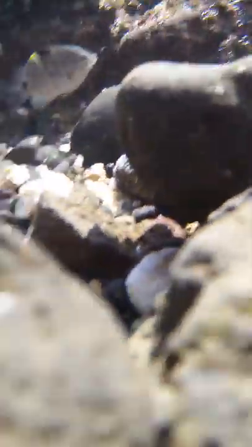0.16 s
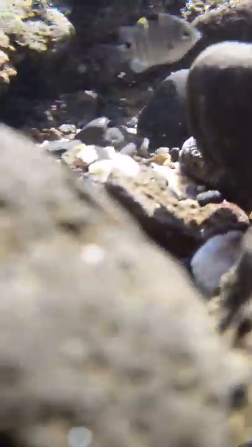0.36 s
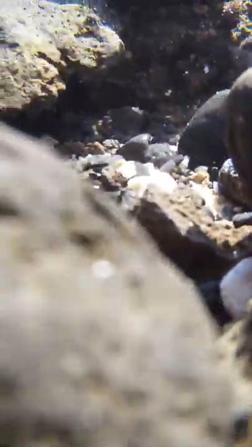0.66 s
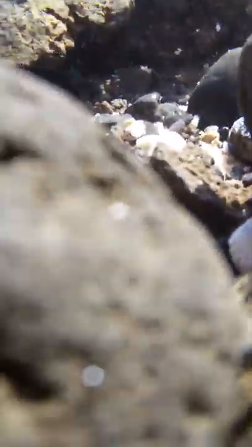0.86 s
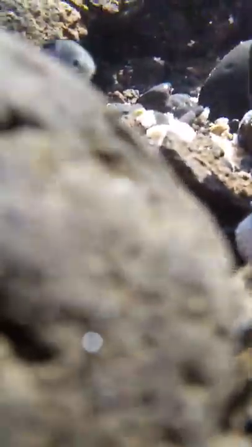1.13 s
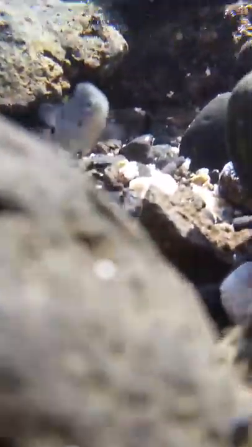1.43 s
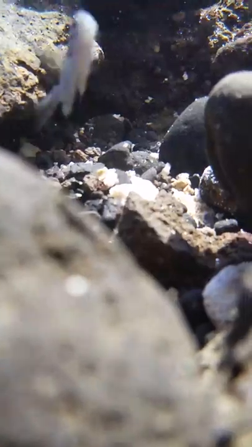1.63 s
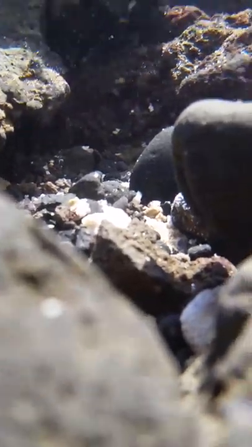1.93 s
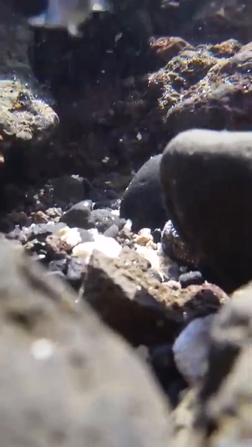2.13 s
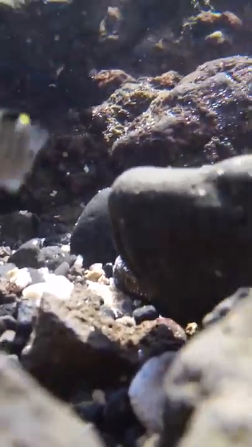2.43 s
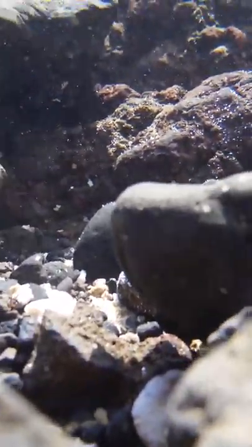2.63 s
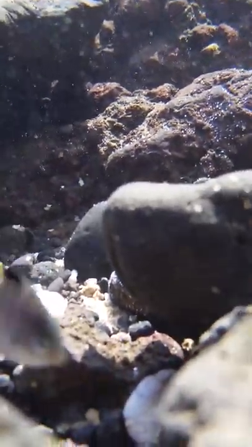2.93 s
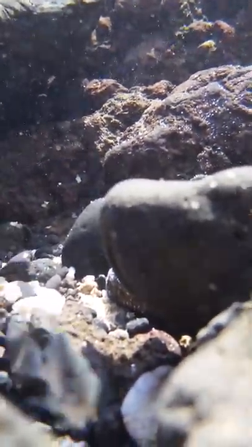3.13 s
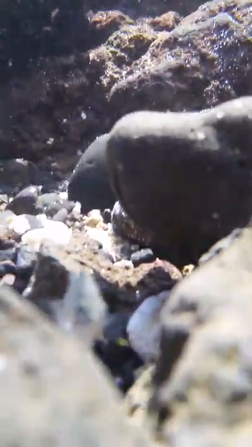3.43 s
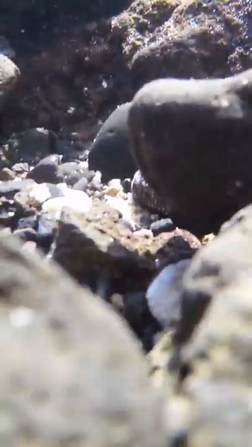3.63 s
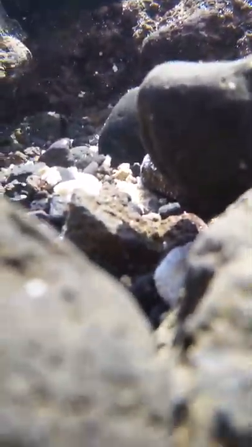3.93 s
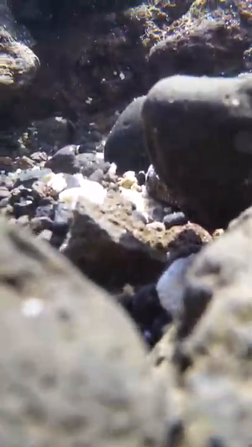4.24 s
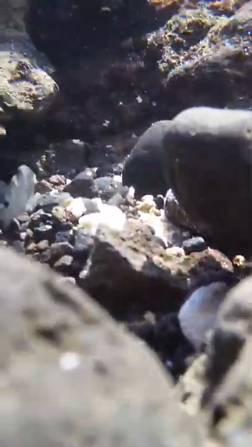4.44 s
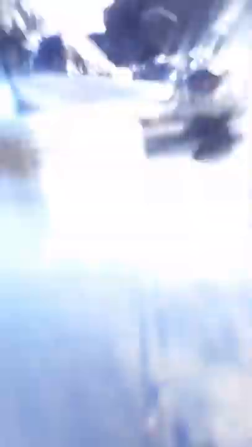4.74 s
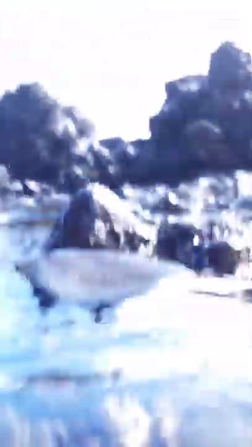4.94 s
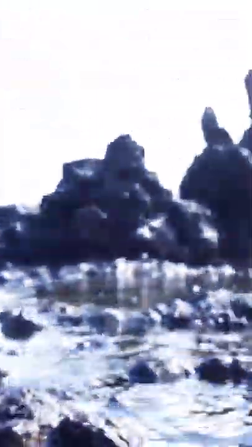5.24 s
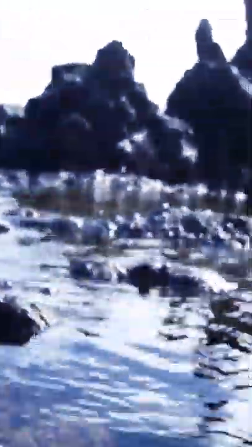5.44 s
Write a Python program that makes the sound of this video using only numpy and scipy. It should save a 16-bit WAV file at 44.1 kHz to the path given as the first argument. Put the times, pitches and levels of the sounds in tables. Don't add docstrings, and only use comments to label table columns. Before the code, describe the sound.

Hard stone knocks and gritty scrapes, mostly on the right, over a faint dull underwater wash with soft fizzing foam on the left.

```python
import sys
import numpy as np
from scipy import signal
from scipy.fft import rfft, irfft, next_fast_len
from scipy.io import wavfile
from scipy.ndimage import uniform_filter1d, minimum_filter1d

SR = 44100
rng = np.random.default_rng(int(sys.argv[2]) if len(sys.argv) > 2 else 0)


def to_wav(sig):
    pcm = np.clip(np.atleast_2d(sig), -1, 1) * 32767
    pcm = np.round(pcm).astype(np.int16)
    wavfile.write(sys.argv[1], SR, pcm.T)


def natural_amplitude(level_db):
    exponent = np.asarray(level_db, float) / 20
    return 10 ** exponent


N = 246519

# (time [s], level [dB])
SURGE = [(0, -46), (.25, -51), (.6, -49), (.77, -43.5), (.85, -46.5), (1.05, -52.5), (1.45, -51),
         (1.8, -52.5), (2.0, -49.5), (2.2, -52.5), (2.55, -48), (2.85, -41), (3.0, -48), (3.3, -46),
         (3.5, -49.5), (4.3, -45.5), (4.75, -46), (5.59, -48)]
# (frequency [Hz], level [dB per Hz])
LEFT_TONE = [(25, -19.5), (60, -1.5), (130, 1.5), (300, -8.5), (600, -22), (1000, -34.5), (1500, -48.5),
             (2100, -58), (2900, -60), (4500, -80), (9500, -75.5), (12200, -54), (15000, -57)]
RIGHT_TONE = [(25, -9.5), (50, 3.5), (150, 4), (400, -7), (750, -5.5), (950, -8), (1150, -32.5),
              (2100, -46), (2900, -29.5), (3700, -37), (4800, -52), (15000, -57)]
# (frequency [Hz], likeness [0-1])
LIKENESS = [(60, 0.93), (110, 0.93), (250, 0.7), (700, 0.9), (1200, 0.019)]
# (time [s], level [dB])
OPENING = [(0, 4.5), (.75, 0.5), (.9, 0), (1.5, 2), (3.5, 3), (4.0, -2.5), (4.4, 3.5), (4.75, 1),
           (4.9, 0.5), (5.5, -4), (5.59, 1.5)]
# (peak time [s], half width [s], level [dB])
FOAM = [
    (0, 0.34, -86.5),
    (0.689, 0.14, -80.5),
    (2.55, 0.11, -87.5),
    (2.879, 0.18, -76),
    (4.35, 0.19, -84.5),
    (4.62, 0.13, -76.5),
    (5.35, 1, -84),
]
# (time [s], half width [s], level [dB])
SPRAY = [
    (4.7655, .0015, -72),
    (4.7715, .001, -72),
    (4.805, .0015, -59),
    (4.808, .002, -55),
    (4.817, .002, -58),
]
# (time [s], level [dB], length [ms])
PUSHES = [
    (0.023, -26, 5.3),
    (0.394, -31, 20),
    (0.588, -45, 4.3),
    (0.692, -29, 11.4),
    (2.061, -23.5, 5),
    (4.738, -21.5, 7.7),
    (4.934, -29, 12),
    (4.994, -20.5, 10.7),
    (5.0658, -11, 3.26),
]
# (start [s], length [s], grit at start [dB], grit at end [dB])
STROKES = [(0, 0.02, -64, -71), (0.017, 0.22, -82, -85.5), (1.204, 0.018, -72.5, -75),
           (1.336, 0.055, -57, -72.5), (1.622, .008, -71, -57), (1.641, 0.013, -49.5, -45.5),
           (1.673, 0.041, -50.5, -80), (1.73, .07, -80, -81), (1.827, 0.087, -48.5, -51.5),
           (1.915, 0.054, -57.5, -68), (1.986, 0.056, -55, -57.5), (2.055, 0.1, -73, -88),
           (2.173, 0.059, -63.5, -72), (2.261, 0.054, -59, -68), (2.333, 0.1, -57, -58.5),
           (2.438, 0.073, -65, -54), (2.502, 0.11, -54.5, -48.5), (2.602, 0.023, -53, -49.5),
           (1.952, .025, -64.5, -58.5), (2.037, 0.017, -60, -63), (1.7, .025, -70, -69),
           (4.808, 0.012, -39.5, -45), (2.744, 0.021, -55.5, -47.5), (2.433, 0.052, -58.5, -67),
           (2.3, .03, -72, -72), (4.38, 0.25, -86, -86.5), (0.615, 0.11, -89, -88), (2.642, 0.1, -65, -65),
           (2.728, 0.038, -57.5, -54), (2.81, 0.082, -51.5, -61), (2.898, 0.052, -71, -73.5),
           (3.06, 0.043, -59.5, -68.5), (3.126, 0.049, -70, -78.5), (3.185, 0.043, -72, -71),
           (3.253, 0.034, -61.5, -49), (3.285, 0.062, -51.5, -50.5), (3.353, 0.054, -54.5, -40.5),
           (3.423, 0.28, -77, -86), (4.173, 0.078, -69.5, -56), (4.26, 0.11, -79, -82.5),
           (4.786, 0.023, -49, -28.5)]
# (frequency [Hz], width [Hz], level [dB])
GRIT_MODES = [(650, 517, 11.5), (2590, 1110, 4.5), (3487, 1300, 3)]
# (time [s], peak [dB], bright edge [dB])
TICKS = [(.017, -43, -42), (.0762, -34.5, -54), (.8136, -41.5, -10.5), (1.1913, -47, -24.5),
         (1.3808, -53.5, -43), (1.5884, -34, -25.5), (1.6092, -39, -49), (1.6468, -38, -66.5),
         (1.8267, -52, -58), (1.8761, -31, -57), (2.04, -55, -46), (2.2239, -37, -41.5),
         (2.4942, -34.5, -45), (2.5722, -28, -56.5), (2.6807, -30, -58), (2.7321, -35, -41),
         (2.7663, -29.5, -46.5), (2.7708, -29, -44.5), (2.7897, -21.5, -45.5), (2.8479, -35, -48),
         (2.8729, -43, -29.5), (2.9886, -34, -43), (3.391, -25.5, -67.5), (3.4118, -34, -50),
         (4.2538, -34, -53.5), (4.7332, -25.5, -23.5), (4.7651, -27.5, -34.5), (4.8025, -29.5, -46.5),
         (4.8066, -30, -37), (4.8158, -28, -50.5)]
# (time [s], peak [dB])
RATTLE = [(2.631, -44), (2.653, -31.5), (2.669, -36), (2.753, -42), (2.7616, -30), (2.774, -30),
          (2.792, -34), (2.7999, -27), (2.804, -30), (2.8124, -31.5), (2.826, -39.5), (2.835, -42),
          (2.855, -38.5), (3.283, -34.5), (3.302, -46.5), (3.3633, -32.5), (3.366, -37.5), (3.406, -39),
          (3.602, -45), (1.634, -37), (1.637, -40.5), (1.6531, -46), (1.668, -46.5), (1.68, -54),
          (1.834, -41), (1.864, -35.5), (1.89, -48.5), (1.937, -53), (1.955, -56), (2.031, -48.5),
          (3.2524, -53.5), (4.159, -54.5), (4.7525, -35), (4.7605, -28.5), (4.77, -31), (4.7765, -31.5),
          (4.789, -38)]
# (time [s], peak [dB], frequency [Hz])
CRACKS = [(0.0757, -26, 2480), (.0757, -31, 1560), (.834, -43, 3300), (.8518, -45, 2900), (.818, -49, 3200),
          (2.9895, -33, 2300), (.8134, -22, 2570), (0.8132, -39.5, 4370), (1.0455, -42, 2770),
          (2.991, -26, 1500), (2.989, -20.5, 1960), (3.6, -39.5, 2300), (3.6295, -56, 2600),
          (3.0065, -40, 2900), (3.0125, -54, 2900), (3, -61, 2900), (3.7, -65, 2750), (2.632, -44.5, 2500),
          (1.048, -59, 1750), (1.5898, -30, 5200), (1.647, -41, 5000), (2.2243, -32.5, 3160),
          (2.764, -32.5, 5000), (2.7672, -34.5, 5000), (2.772, -38.5, 5220), (2.7762, -37.5, 5000),
          (2.79, -10, 3500), (2.795, -36, 5000), (2.801, -37, 4930), (2.8133, -37.5, 4800),
          (2.826, -50, 5380), (2.834, -39.5, 4880), (2.848, -36, 3700), (2.874, -43, 4500),
          (3.393, -55.5, 4600), (3.46, -52, 4900), (4.7526, -31, 4230), (4.771, -30, 5200)]
# (time [s], peak [dB])
CHIPS = [(.8130, -47), (1.8860, -57), (2.4940, -59), (2.7330, -52), (2.7530, -57), (2.7897, -46),
         (2.8060, -53), (2.8265, -50.5), (2.8550, -57), (2.9895, -50.5), (2.9905, -54), (3.0045, -59.5),
         (3.3910, -55), (3.4135, -57.5), (4.7655, -48), (4.7770, -54.5), (4.8066, -48), (4.8165, -50)]
# (time [s], peak [dB], frequency [Hz])
TAPS = [(.0758, -29.5, 730), (1.0475, -21.5, 840), (1.0925, -46.5, 807), (1.1605, -42.5, 780),
        (1.183, -30.5, 800), (1.5885, -28.5, 828), (3.6022, -21.5, 885), (2.7315, -35, 600),
        (2.875, -27, 510), (4.8022, -22, 685), (2.7655, -19.5, 749.5), (3.3635, -29.5, 642),
        (4.1172, -23.5, 652), (4.1475, -19, 730), (4.334, -32.5, 695), (5.0435, -42, 757),
        (5.0668, -35, 684), (5.1012, -40, 800), (5.1048, -48, 770)]
# (time [s], contact force [dB], housing frequency [Hz])
CLACKS = [(0.0751, -17, 1490), (0.811, -32, 1370), (0.8329, -4.5, 970), (1.0474, -11.5, 890),
          (1.0472, -25, 815), (1.1604, -29, 950), (1.182, -37, 946), (1.5883, -34, 1220), (2.224, -10, 637),
          (2.9891, 3.5, 1000), (3.004, -4, 905), (1.829, -4, 530), (1.876, -5.5, 590), (2.5718, -22, 547),
          (2.5969, -10.5, 517), (2.7622, 1.5, 610), (2.7663, 1.5, 624), (2.7899, 2.5, 671),
          (2.8748, -8, 480), (3.39, -3, 680), (3.413, -27, 698), (4.116, -24, 812), (4.334, -29.5, 700),
          (4.1465, -32, 738), (4.7317, -3, 1220), (4.7517, -21, 980), (4.759, -11, 890), (4.7705, -38, 904),
          (4.7982, 8, 508), (4.8032, -11, 595)]
# (time [s], blow [dB], membrane frequency [Hz])
NUDGES = [(1.1092, -24.5, 143), (1.1904, -15, 222), (1.2005, -13, 183), (2.259, -25.5, 278),
          (2.401, -24, 292), (2.422, -32, 290), (2.384, -38, 283.5), (1.836, -23, 260), (1.845, -24, 250),
          (1.993, -22.5, 240), (2.061, -28, 170), (2.737, -21, 200), (4.8158, -18, 170),
          (1.675, -20.5, 200), (2.392, -28.5, 283), (2.346, -39, 260), (2.496, -24, 220), (2.534, -33, 250),
          (4.1226, -19.5, 306), (4.157, -15.5, 173), (1.6502, -17, 172), (1.8287, -18, 250),
          (1.8604, -21.5, 510), (1.875, -14.5, 340), (1.9138, -23.5, 215), (2.5155, -21, 120),
          (2.571, -19, 144), (2.7511, -14.5, 245), (2.7893, -7, 162), (2.7981, -7, 145.6),
          (3.2491, -19, 211), (3.2653, -12.5, 205.4), (3.282, -12, 213.4), (3.292, -13.5, 214),
          (3.3225, -12, 214), (3.3257, -18.5, 233), (2.867, -16, 201), (3.4002, -24, 199), (4.78, -12, 175),
          (4.7938, -15.5, 297), (5.0438, -17, 106.2), (2.202, -26.5, 273)]
# (time [s], blow [dB], contact [ms], membrane frequency [Hz], ring time to -60 dB [s])
BOUNCES = [(0.8176, -12, 1.54, 310, 0.026), (0.838, -14, 2, 200, 0.0057), (1.0527, -7.5, 3.5, 100, 0.02),
           (1.166, -25, 1.1, 300, 0.045), (1.1873, -14, 1.43, 343, 0.03), (1.5936, -7, 2.1, 380, 0.025),
           (1.615, -15.5, 2.2, 169, 0.0096), (2.6582, -19.5, 2.82, 240, 0.03),
           (2.6741, -23, 1.7, 216, 0.028), (2.9941, -12.5, 1.25, 302, 0.018), (2.9915, -7, 2, 496, 0.004),
           (3.0094, -7, 2.33, 196.5, 0.0045), (3.6079, -28.5, 2, 300, 0.098),
           (4.1221, -14, 2.17, 333, .025), (4.3394, -22.5, 2.05, 139.2, 0.0066),
           (4.7369, -7, 1.43, 137, 0.012), (4.765, -4.5, 2.3, 141, 0.0035), (4.7745, -8.5, 1.9, 142, 0.018)]
# (time [s], blow [dB], contact [ms], membrane frequency [Hz], ring time to -60 dB [s])
RINGS = [(0.0748, -9, 3.18, 148, 0.012), (.85, -2.5, 2.53, 244, 0.015), (1.0508, -3.5, 3.27, 110.5, 0.011),
         (1.6214, -15.5, 3.2, 158, 0.2), (1.886, -11, 2.1, 189, 0.071), (2.2243, -16, 3, 288, 0.044),
         (2.598, -15, 2.1, 200, 0.01), (2.602, -8, 3, 154.5, 0.047), (2.6803, -9.5, 2.9, 126, 0.05),
         (2.7632, -14, 1, 169, 0.068), (2.7887, -2, 1.9, 382, 0.006), (2.811, -5.5, 4.1, 157.6, 0.049),
         (2.837, -10, 2.4, 206.4, 0.053), (3.0113, -4.5, 2.8, 162, 0.036), (3.313, -1.1, 1.5, 228, 0.046),
         (3.3626, -3, 3.05, 229, 0.031), (3.3759, -11, 2.2, 182.4, 0.074), (3.387, -10, 3.7, 332, 0.031),
         (4.116, -2.5, 1.84, 259, 0.014), (4.147, -3.5, 1.6, 340, 0.028), (4.2533, -10, 1.01, 376, 0.037),
         (4.7354, -0.5, 2.9, 450, 0.00075), (4.763, -7.5, 0.85, 350, 0.015),
         (5.0676, -11, 2.28, 132, 0.052)]
# (time [s], blow [dB], contact [ms], membrane frequency [Hz], rebound [share of the blow])
SNAPS = [(0.812, -2.5, 1.86, 158, 1.64), (0.832, -4.5, 3.14, 252, 1.1), (1.0462, -5, 3.05, 182, 0.69),
         (1.0887, -16, 5.8, 151.5, 1.1), (1.1599, -4.5, 2.67, 423, 0.26), (1.182, -5, 2.47, 397, 0.35),
         (1.5876, -5.5, 2.85, 195, 2.02), (1.6081, -4, 4.4, 175, 0.46), (2.6534, -8, 3, 163.5, 0.74),
         (2.6681, -7, 3.3, 168, 0.29), (2.7736, -8.5, 3.9, 212, 1.66), (2.9884, -3.5, 2.8, 271, 1.44),
         (3.0035, -3.5, 2.9, 236, 0.25), (3.601, -7.5, 1.698, 291, 1.05), (3.6273, -17, 4, 269, 0.31),
         (4.3332, -2.5, 2.92, 215.3, 0.13), (4.7318, -2, 1.84, 184, 1.25), (4.752, -19, 0.96, 245, 12.8),
         (4.7593, -1.3, 2.34, 121, 1.12), (4.7701, 0.1, 1.77, 193, 0.034)]


def rms_one(x):
    return x / np.sqrt(np.mean(x ** 2) + 1e-20)


def in_time(rows, outside=None):
    s, *columns = np.transpose(rows)
    t = np.arange(N) / SR
    return [np.interp(t, s, column, outside, outside) for column in columns]


def at_hz(points, hz):
    table_hz, values = np.transpose(points)
    return np.interp(np.log(hz + 1), np.log(table_hz), values)


def drift(rate_hz):
    r = np.exp(-2 * np.pi * rate_hz * 40 / SR)
    noise = rng.standard_normal(N // 40 + 2002)
    slow = signal.lfilter([1], [1, -2 * r, r * r], noise)[2000:]
    return np.interp(np.arange(N) / 40, np.arange(len(slow)), rms_one(slow))


def cut(x, hz, kind, order=2):
    return signal.sosfilt(signal.butter(order, hz, kind, fs=SR, output="sos"), x)


def resonate(x, hz, width_hz):
    r = np.exp(-np.pi * width_hz / SR)
    top = np.array([1, 0, -1]) * (1 - r * r) / 2
    bottom = [1, -2 * r * np.cos(2 * np.pi * hz / SR), r * r]
    return signal.lfilter(top, bottom, x + 1e-18)


def resonate_twice(x, hz, width_hz):
    return resonate(resonate(x, hz, width_hz), hz, width_hz)


def bump(u):
    return np.sin(np.pi * np.clip(u, 0, 1)) ** 2


def bells(rows):
    t = np.arange(N) / SR
    return sum(natural_amplitude(db) * np.exp(-((t - s) / width) ** 2) for s, width, db in rows)


def add(out, s, piece):
    at = int(round(s * SR))
    out[at:at + len(piece)] += piece[:N - at]


def add_peak(out, s, db, piece):
    add(out, s, natural_amplitude(db) * piece / np.abs(piece).max())


def preamp_hiss():
    return natural_amplitude(-92.0) * rng.standard_normal((2, N))


def foam():
    calm_db = -94.5
    return natural_amplitude(calm_db) + bells(FOAM)


def wash():
    patchy_db, lumpy_db = 0.7, 2.0
    size = next_fast_len(N)
    hz = np.arange(size // 2 + 1) * SR / size
    shared, own = rfft(rng.standard_normal((2, size)))
    alike = np.clip(at_hz(LIKENESS, hz), 0, 1)
    partly_shared = alike * shared + np.sqrt(1 - alike ** 2) * own
    ports = [shared * natural_amplitude(at_hz(LEFT_TONE, hz)), partly_shared * natural_amplitude(at_hz(RIGHT_TONE, hz))]
    edges = [0, 70, 140, 280, 560, 1100, 2200, 8000, SR]
    bands = np.array([[irfft(port * ((hz >= low) & (hz < high)), size)[:N]
                       for low, high in zip(edges, edges[1:])] for port in ports])
    together = drift(3.1)
    for k in range(len(edges) - 1):
        depth_db = lumpy_db if k < 2 else patchy_db
        bands[:, k] *= natural_amplitude(depth_db * (0.87 * together + drift(4.7)))
    bands[:, 5:7] *= natural_amplitude(in_time(OPENING)[0])

    wash_db, = in_time(SURGE)
    rumble_db = -41.0 + (wash_db + 48)
    rumble = natural_amplitude(rumble_db) * rms_one(bands[0, :3].sum(0))
    middle = natural_amplitude(wash_db) * rms_one(bands[0, 3:7].sum(0))
    fizz = foam() * rms_one(resonate(bands[0, 7], 12200.0, 1500.0))
    right_db = -56 + 0.88 * (wash_db + 52.5)
    right = natural_amplitude(right_db) * rms_one(bands[1].sum(0))
    return np.array([rumble + middle + fizz, right])


def ducking(loud):
    deepest_db, ahead_s, release_db_s = 6, 0.019, 91.5
    depth_db = deepest_db * np.clip((np.abs(loud) - .5) / .4, 0, 1)
    ramp = release_db_s * np.arange(N) / SR
    held = np.maximum.accumulate(depth_db + ramp) - ramp
    lead = int(ahead_s * SR)
    early = -minimum_filter1d(-held, size=lead, origin=-(lead // 2))
    return natural_amplitude(-uniform_filter1d(early, size=300))


def spray():
    return bells(SPRAY) * rms_one(cut(rng.standard_normal(N), 11500.0, "high", order=4))


def bright(clicks):
    return cut(resonate_twice(clicks, 4450.0, 2400.0), 6600.0, "low", order=4)


def through_port(clicks):
    modes = np.zeros(len(clicks))
    for k, (hz, width, db) in enumerate(GRIT_MODES):
        modes += natural_amplitude(db) * resonate_twice(clicks, hz, width) * (-1) ** k
    shoulder = resonate_twice(clicks, 4500.0, 2100.0)
    return cut(modes, 3950.0, "low", order=4) + natural_amplitude(-34.5) * shoulder


def strokes():
    rise_db_s, fall_db_s, drop_db = 904, 1899.5, 50
    levels = []
    for s, length, start_db, end_db in STROKES:
        end = s + max(length, .001)
        shape = [(s - drop_db / rise_db_s, start_db - drop_db), (s, start_db),
                 (end, end_db), (end + drop_db / fall_db_s, end_db - drop_db)]
        levels.append(in_time(shape, outside=-140)[0])
    return np.max(levels, axis=0)


def grinding():
    grit_db = strokes()
    sizes = natural_amplitude(3 * np.minimum(rng.exponential(1, N), 5)) * rng.choice([-1, 1], N)
    fine = sizes * (rng.random(N) < 9000 / SR) * natural_amplitude(2.6 * drift(40))
    shards = (rng.random(N) < 440 / SR) * rng.standard_normal(N)
    grains = fine / fine.std() + natural_amplitude(19) * shards
    low_shoulder = rms_one(resonate_twice(grains, 1700.0, 460))
    heart = rms_one(resonate_twice(grains, 2950, 800.0))
    colour = rms_one(through_port(grains)) + natural_amplitude(-12.5) * low_shoulder + natural_amplitude(-9) * heart
    grit = natural_amplitude(grit_db + 5.0) * colour
    rasp = natural_amplitude(-70.0 + 1.3 * (grit_db + 50)) * rms_one(bright(grains))

    slips = sizes * (rng.random(N) < 330 / SR) * rng.choice([-1, 1], N)
    tone = rng.integers(0, 6, N)
    rings = sum(resonate(slips * (tone == k), hz, 82.0)
                for k, hz in enumerate(np.geomspace(150.0, 340.0, 6)))
    rumble_db = np.minimum(-36.5 + 0.93 * (grit_db + 58.0), -30.0)
    rumble = uniform_filter1d(natural_amplitude(rumble_db), size=400) * rms_one(cut(rings, 590.0, "low"))
    return grit + rasp + rumble


def ticks():
    crumble_s, edge_s = .0009, .0003
    body, edge, t = np.zeros(N), np.zeros(N), np.arange(400) / SR
    blow_edge_db = -43.5
    rows = list(TICKS)
    for s, db, *_ in list(SNAPS) + list(RINGS):
        rows.append((s + 0.00076, 7.2 * db - 30.5, blow_edge_db))
    rows += [(s, db, blow_edge_db) for s, db in RATTLE]
    crumbs = rng.standard_normal((len(rows), 400)) * natural_amplitude(-12) * np.exp(-t / crumble_s)
    crumbs[:, 0] = 1
    for (s, db, edge_db), crumb in zip(rows, crumbs):
        add(body, s, natural_amplitude(db + 21.0) * crumb)
        add(edge, s, natural_amplitude(db + edge_db + 29.0) * crumb * np.exp(-t / edge_s))
    grit = through_port(body) + natural_amplitude(-19.5) * bright(body)
    return grit + resonate_twice(edge, 12400.0, 4500.0) + natural_amplitude(-12.0) * cut(edge, 4500.0, "high")


def cracks():
    sharpness = 2.0
    out, click = np.zeros(N), 1.0 * (np.arange(200) == 0)
    for s, db, hz in CRACKS:
        piece = cut(resonate_twice(click, hz, hz / sharpness), 4300.0, "low", order=4)
        add_peak(out, s, db, piece)
    return out


def chips():
    out, splinter = np.zeros(N), bright(1.0 * (np.arange(900) == 0))
    for s, db in CHIPS:
        add_peak(out, s, db, splinter)
    return out


def taps():
    contact_ms, sharpness = 1, 3
    out, t = np.zeros(N), np.arange(900) / SR
    force = bump(t * 1000 / contact_ms)
    for s, db, hz in TAPS:
        add_peak(out, s, db, resonate_twice(force, hz, hz / sharpness))
    return out


def clacks():
    contact_ms, sharpness, upper_ratio = 0.44, 3.5, 2.3
    out, t = np.zeros(N), np.arange(900) / SR
    force = bump(t * 1000 / contact_ms)
    for s, db, hz in CLACKS:
        lower = resonate(force, hz, hz / sharpness)
        upper = natural_amplitude(-22) * resonate(force, upper_ratio * hz, hz / sharpness)
        add(out, s, natural_amplitude(db - 2.5) * (lower - upper))
    return out


def blows():
    rows = []
    for s, db, ms, hz, rebound in SNAPS:
        rows.append((s, db, ms, hz, 0.0065, rebound))
        if db > -8.0:
            rows.append((s + 0.0047 + 0.0016, db - 29.5, 2.5, 340.0, 0.041, 0))
    rows += [tuple(row) + (0,) for row in BOUNCES]
    rows += [(s, db, 3.32, hz, 0.035, 0) for s, db, hz in NUDGES]
    rows += [tuple(row) + (0.05,) for row in RINGS]
    return rows


def knocks():
    mic_cut_hz, dull_hz = 70.0, 1300.0
    snap_s, settle_s = .0008, .0025
    out, t = np.zeros(N), np.arange(4800) / SR
    for s, db, ms, hz, ring_s, rebound in blows():
        contact = ms / 1000
        swing = -resonate(bump(t / contact), hz, np.log(1000) / np.pi / ring_s)
        since = t - .7 * contact
        rise = snap_s * (2 if db < -12 and ms > 3 else 1)
        snap = bump(np.minimum(since / rise, 1) / 2) * np.exp(-np.maximum(since - rise, 0) / settle_s)
        piece = swing / np.abs(swing).max() + rebound * cut(snap, mic_cut_hz, "high")
        piece = natural_amplitude(db) * piece
        if db < -6.8 and ms > 1.3:
            s = s - .0003
            piece = cut(piece, dull_hz, "low", order=4)
        add(out, s, piece)
    for s, db, ms in PUSHES:
        push = cut(bump(t * 1000 / ms), 45.0, "high")
        add(out, s, natural_amplitude(db) * cut(push, dull_hz, "low"))
    return out


def scene():
    thuds, stone, grit = knocks(), clacks(), ticks()
    leak = natural_amplitude(-50) * cut(thuds, 500.0, "high") + natural_amplitude(-36.5) * stone + natural_amplitude(-47) * grit
    right = thuds + taps() + chips() + stone + grit + cracks() + grinding() + spray()
    background = (wash() + preamp_hiss()) * ducking(thuds)
    return background + np.array([leak, right])


def roll_off(x):
    return signal.sosfilt(signal.butter(12, 15800, fs=SR, output="sos"), x)


def record(dry):
    knee, room = .65, .34
    over = np.maximum(np.abs(dry) - knee, 0)
    limited = dry - np.sign(dry) * (over - room * np.tanh(over / room))
    return roll_off(limited)


dry = scene()
out = record(dry)
to_wav(out)
```